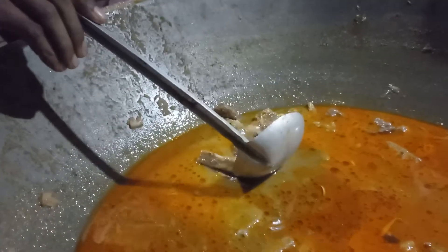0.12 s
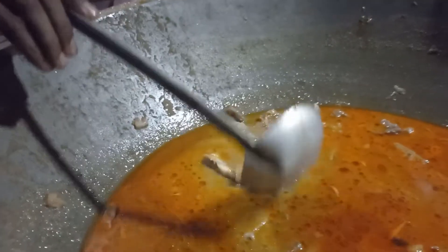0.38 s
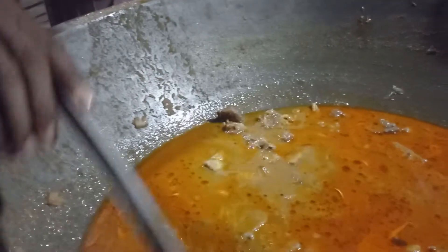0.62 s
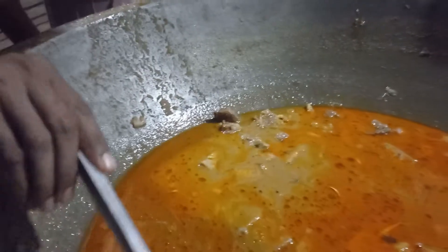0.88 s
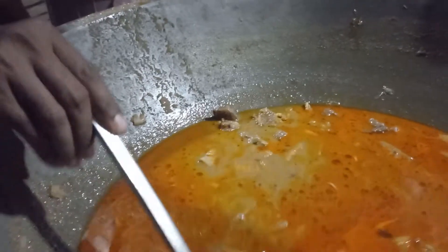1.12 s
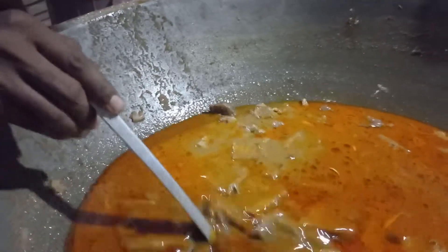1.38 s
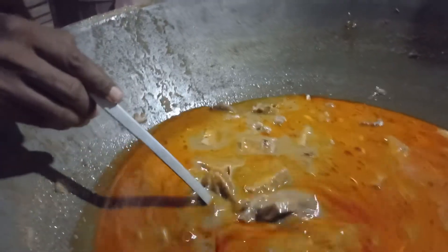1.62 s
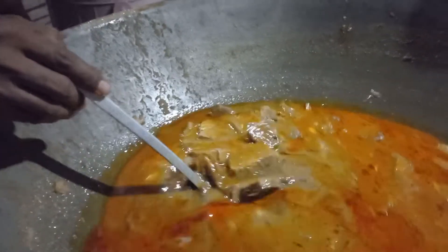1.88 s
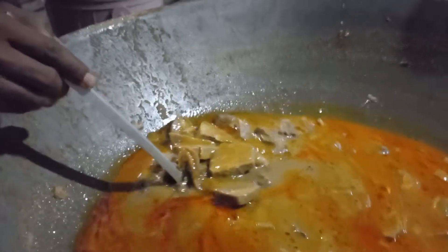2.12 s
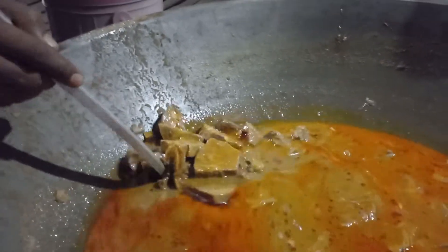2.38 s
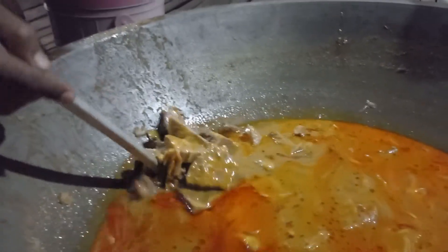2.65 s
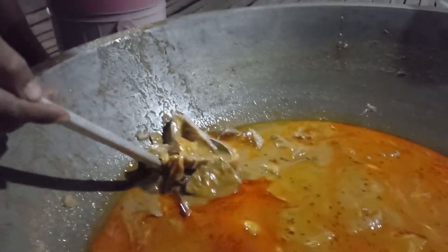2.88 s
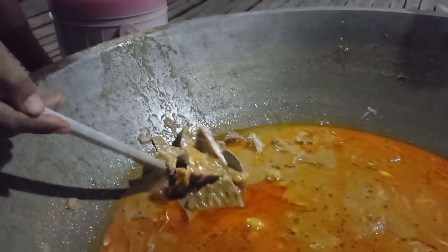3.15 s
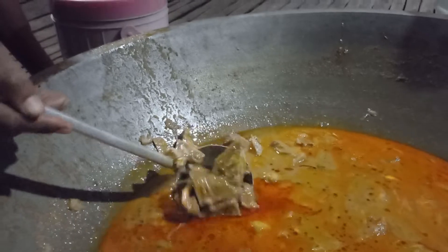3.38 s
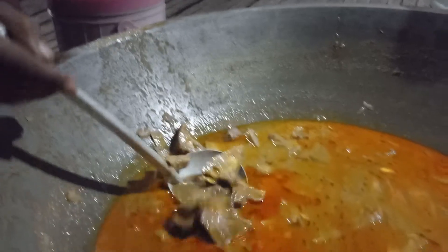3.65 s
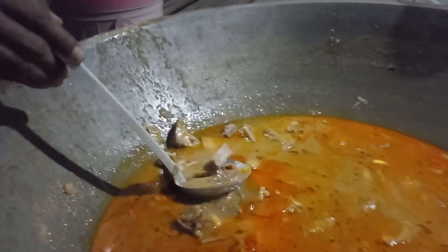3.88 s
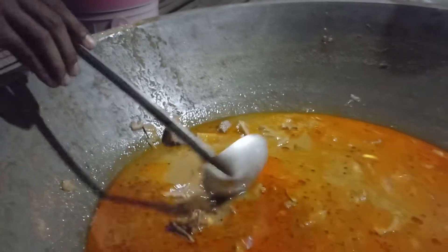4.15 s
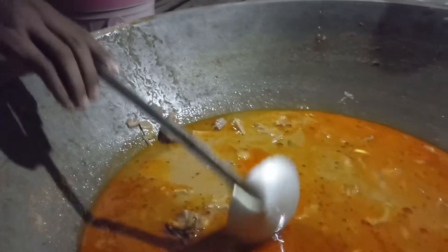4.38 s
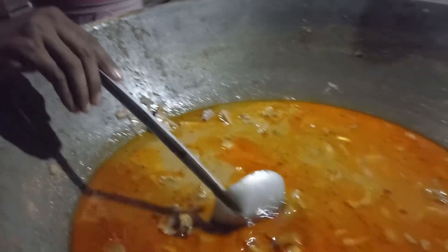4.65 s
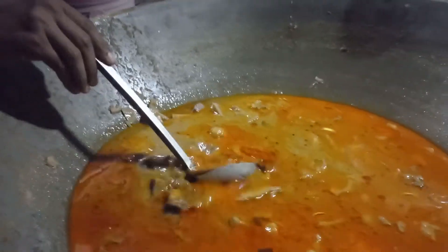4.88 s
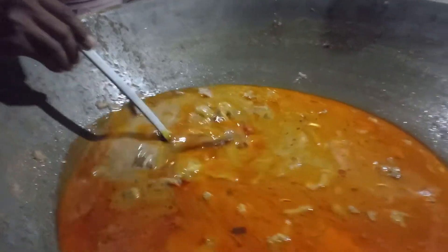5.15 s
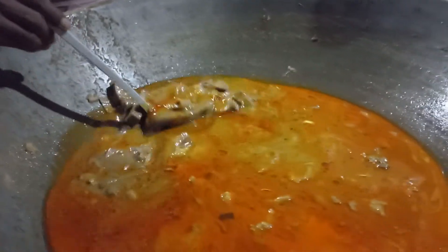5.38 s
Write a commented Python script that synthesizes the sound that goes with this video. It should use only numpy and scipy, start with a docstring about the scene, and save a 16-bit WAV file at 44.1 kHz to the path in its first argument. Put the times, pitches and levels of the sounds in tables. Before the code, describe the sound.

A metal ladle scrapes hard along the wall of a big full wok, with light taps and drips, over a distant engine outdoors.

```python
"""Outdoors, by a large wok of broth: air rumble, faint treble noise and a distant engine run from the start.
Small ticks come first, then a metal ladle is dragged hard along the wall at 0.9 s, its grit ringing the bowl.
Light rubs, taps, a small knock and drips follow as the engine climbs; a high hiss steps up at 3.9 s and stays.
The second hard stroke comes at 5.0 s. Noise drives the air, cosines the engine, grit clicks the wok's modes."""
import sys
import numpy as np
from scipy import signal
from scipy.fft import rfft, irfft
from scipy.io import wavfile
from scipy.ndimage import uniform_filter1d

SR = 44100
rng = np.random.default_rng(int(sys.argv[2]) if len(sys.argv) > 2 else 0)


def attenuation_scalar(level_db):
    """Turn a level in dB into a linear amplitude multiplier (20 dB per decade)."""
    decades = np.asarray(level_db, float) / 20
    return 10 ** decades


def digitize_waveform(pressure):
    """Quantize a signal to 16-bit integers and store it at the path in sys.argv[1].

    Rows of a 2-D input are taken as channels; values are limited to [-1, 1].
    """
    field = np.atleast_2d(pressure).T
    bounded = np.clip(field, -1, 1)
    quanta = np.round(bounded * 32767).astype(np.int16)
    wavfile.write(sys.argv[1], SR, quanta)


N = 243431  # samples


def evened(x):
    """Scales to rms 1."""
    return x / np.sqrt(np.mean(x ** 2) + 1e-20)


def read(points, hz):
    """Reads a spectrum on a log-frequency axis."""
    f, value = np.transpose(points)
    return np.interp(np.log(hz + 1), np.log(f + 1), value)


def add(mix, s, sound):
    """Adds a sound of several rows at time s."""
    part = mix[:, round(s * SR):][:, :sound.shape[1]]
    part += sound[:, :part.shape[1]]


def band(x, lo_hz, hi_hz):
    """Band-pass."""
    return signal.sosfilt(signal.butter(3, [lo_hz, hi_hz], "band", fs=SR, output="sos"), x)


def drift(count, seconds):
    """Slow random drift of rms 1: noise averaged twice over the given time."""
    size = max(round(seconds * SR), 1)
    smooth = uniform_filter1d(rng.standard_normal(count), size)
    return evened(uniform_filter1d(smooth, size))


# likeness of left and right at the microphone pair: pitch_hz, likeness (-1 to 1)
LIKENESS = [(60, 0.99), (180, 0.96), (550, 0.76), (1650, -0.39), (4970, 0.036), (15000, -0.14)]


def paired(left, other, hz):
    """Mixes two independent spectra into a left and right as alike as the microphone pair hears them."""
    same = np.clip(read(LIKENESS, hz), -1, 1)
    return np.array([left, same * left + np.sqrt(1 - same ** 2) * other])


def noise(shape, patchy_db):
    """Two-channel noise from a magnitude over (Hz, s), alike in the bass, with drifting patches."""
    frames, hz = N // 256 + 5, np.fft.rfftfreq(1024, 1 / SR)[:, None]
    a, b, c, d, patches = rng.standard_normal((frames, 513, 5)).T
    patches = uniform_filter1d(patches, 8, axis=0)  # over pitch
    patches = evened(uniform_filter1d(patches, 10, axis=1))  # over time
    z = paired(a + 1j * b, c + 1j * d, hz)
    z *= shape(hz, np.arange(frames) * 256 / SR) * attenuation_scalar(patchy_db * patches)
    return signal.istft(z, nperseg=1024, noverlap=768)[1][:, :N]


# distant engine, also followed by the low mids of the air: start_s, firing_rate_hz, level_db (rms)
ENGINE_RUN = [(0, 53.74, -61), (1.498, 56.76, -57.5), (2.299, 58.77, -52), (2.971, 60.52, -46),
              (3.801, 61.34, -53.5), (4.401, 62.88, -51), (4.8, 62.64, -61.5)]
# colour of the outdoor air: pitch_hz, level_db (relative, per Hz)
AIR_COLOUR = [(40, -10), (60, 0), (107, -3.5), (139, -14), (183, -4), (205, -20), (417, -17), (730, -27.5),
              (2160, -28), (2700, -48.5), (4000, -82)]
# colour of the steady faint treble noise, with gaps between its bands: pitch_hz, level_db (relative)
TREBLE_COLOUR = [(1530, -43), (2600, -13.5), (3580, -12), (4460, -15.5), (5650, -4.5), (6190, -24),
                 (7200, -3), (8070, -17), (10100, -5.5), (14600, -1.5), (16000, -7.5)]
# colour of the high hiss: pitch_hz, level_db (relative)
HISS_COLOUR = [(10500, -28), (12500, -10.5), (13800, -1), (15900, 2)]
# rise of the high hiss: start_s, level_db (rms)
HISS_RISE = [(0, -61), (2.0, -50.5), (3.88, -45), (3.93, -36), (4.301, -35.5), (5.52, -35)]
AIR_DB, TREBLE_DB = -44.5, -51.5  # rms
RUMBLE_DB_PER_S, ROAR_SHARE = 0.5, 0.46  # growth of the rumble; dB of low mids per dB of engine
PASS_S, PASS_WIDTH_S, PASS_DB = 5.18, 0.51, 8  # the low mids swell once more, briefly


def outdoors():
    """Rumble that grows, low mids that follow the engine; steady treble noise and the high hiss on top."""
    engine_s, _, engine_db = np.transpose(ENGINE_RUN)

    def air_shape(hz, t):
        low = 1 / (1 + (hz / 180) ** 4)
        mid = 1 / (1 + (hz / 900) ** 3)
        roar_db = ROAR_SHARE * np.interp(t, engine_s, engine_db - engine_db[0])
        pass_db = PASS_DB * np.exp(-((t - PASS_S) / PASS_WIDTH_S) ** 2)
        swell_db = low * RUMBLE_DB_PER_S * t + (mid - low) * (roar_db + pass_db)
        return attenuation_scalar(read(AIR_COLOUR, hz) + swell_db)

    air = attenuation_scalar(AIR_DB) * evened(noise(air_shape, patchy_db=-0.5))
    treble = attenuation_scalar(TREBLE_DB) * evened(noise(lambda hz, t: attenuation_scalar(read(TREBLE_COLOUR, hz)), patchy_db=1.0))
    hiss = evened(noise(lambda hz, t: attenuation_scalar(read(HISS_COLOUR, hz)), patchy_db=0.6))
    hiss_db = np.interp(np.arange(N) / SR, *np.transpose(HISS_RISE))
    return air + treble + hiss * attenuation_scalar(hiss_db)


# harmonics heard from the engine: multiple of the firing rate, level_db (relative, before wavering)
HARMONICS = [(4, -3.5), (5, 4), (6, -6.5), (7, -2.5), (8, -5.5), (9, -7.5)]
# lone drones: start_s, end_s, pitch_hz, first_level_db, last_level_db (rms, before fades and wavering)
LONE_DRONES = [(0, 1.87, 139.5, -52.5, -56), (2.4, 3.4, 200.5, -50, -53), (0, 5.39, 72, -55, -50)]
DRONE_IN_S, DRONE_OUT_S = 0.097, 0.53  # fades


def engine():
    """Wavering harmonics of the firing rate, and lone drones; the same in both channels."""
    t, out = np.arange(N) / SR, np.zeros(N)
    s, rate_hz, level_db = np.transpose(ENGINE_RUN)
    turns = np.cumsum(np.interp(t, s, rate_hz) * (1 + 0.0033 * drift(N, 0.056))) / SR
    for multiple, harmonic_db in HARMONICS:
        swell = attenuation_scalar(harmonic_db + 1.6 * drift(N, 0.11))
        out += swell * np.cos(2 * np.pi * (multiple * turns + rng.random()))
    out = evened(out) * attenuation_scalar(np.interp(t, s, level_db))
    for start, end, hz, first_db, last_db in LONE_DRONES:
        fade = np.interp(t, [start, start + DRONE_IN_S, end - DRONE_OUT_S, end], [0, 1, 1, 0])
        turns = np.cumsum(hz * (1 + 0.012 * drift(N, 0.0765))) / SR
        db = np.interp(t, [start, end], [first_db, last_db]) + 2.0 * drift(N, 0.167)
        out += np.sqrt(2) * fade * attenuation_scalar(db) * np.cos(2 * np.pi * turns)
    return out


# small ticks, some of them the bright click of a ladle knock:
# start_s, level_db (rms at onset), centre_hz, spread_octaves (each way)
SMALL_TICKS = [(0.4357, -23.5, 8100, 0.82), (0.467, -25, 10200, 1.4), (0.504, -30.5, 8000, 1.9),
               (1.252, -32, 10000, 0.82), (2.188, -27.5, 4470, 0.43), (2.602, -35.5, 4200, 0.54),
               (2.6115, -28, 3980, 0.26), (2.7345, -19.5, 5700, 1.6), (3.7382, -30, 4960, 2.2),
               (4.0518, -28.5, 3500, 0.56)]
# drips and one small knock (at 3.7377 s), all short tones:
# start_s, level_db (left, undecayed), pitch_hz (at onset), t60_s
SHORT_TONES = [(3.6516, -38, 3110, 0.026), (3.7377, -35.5, 1470, 0.017), (4.6681, -35, 1790, 0.042)]
# the full wok is bumped: start_s, boom_level_db (undecayed peak), thud_level_db (right, rms at onset)
WOK_BUMPS = [(1.216, -64, -30), (1.40, -39, -37), (4.979, -15.5, -32), (5.029, -28, -59), (5.098, -25, -41)]
BOOM_HZ, BOOM_T60_S = 221.2, 0.13
THUD_LO_HZ, THUD_HI_HZ, THUD_T60_S = 307, 947, 0.19


def broth():
    """Ticks are noise bursts, drips and a small knock short rising tones, bumps one deep mode and a thud."""
    out, t = np.zeros((2, N)), np.arange(2000) / SR
    for s, db, hz, octaves in SMALL_TICKS:
        spread = 2 ** max(octaves, 0.1)
        burst = evened(band(rng.standard_normal((2, len(t))), hz / spread, min(hz * spread, SR / 2.5)))
        snap = attenuation_scalar(-60 * t / 0.0031)
        spray = min(octaves, 1) ** 2 * attenuation_scalar(-15.0 - 60 * t / 0.081)  # wide ticks trail more of it
        add(out, s, burst * (snap + spray) * attenuation_scalar(db))
    for s, db, hz, t60 in SHORT_TONES:
        rising = np.sin(2 * np.pi * hz * t * (1 + 2.1 * t))
        tone = rising * np.minimum(t / 0.00068, 1) * attenuation_scalar(db - 60 * t / t60)
        add(out, s, np.array([tone, 0.32 * tone]))
    t = np.arange(SR // 4) / SR
    for s, boom_db, thud_db in WOK_BUMPS:
        boom = np.sin(2 * np.pi * BOOM_HZ * t) * np.minimum(t / 0.0097, 1)
        boom *= attenuation_scalar(boom_db - 60 * t / BOOM_T60_S)
        thud = evened(band(rng.standard_normal(len(t)), THUD_LO_HZ, THUD_HI_HZ))
        thud *= attenuation_scalar(thud_db - 60 * t / THUD_T60_S)
        add(out, s, np.array([boom + 0.485 * thud, boom + thud]))
    return out


# named modes of the wok wall: pitch_hz, level_db (relative, before the spot scatter)
WALL_MODES = [(772, -10), (993, -10), (1233, -8), (1489, -6), (1594, -8), (1762, 3), (1899, 7), (2001, 7),
              (2110, 6), (2190, 4), (2289, 5), (2388, 5), (2580, 1)]
# dense modes in between: pitch_hz, level_db (relative, per Hz)
DENSE_MODES = [(350, -24), (700, -17), (1000, -7), (1500, -3), (1900, 4), (2500, 3), (2750, -8.5),
               (5800, -7.5), (6500, -13), (9500, -7.5), (12500, -16.5), (16000, -18)]
MODE_T60_S, DENSE_T60_S, DENSE_DB = 0.09, 0.07, 3  # dense level is relative to the named modes
SPOT_DB = 2  # scatter of the modes from spot to spot
DEEP_HZ, EDGE_FROM_HZ = 1600, 2700  # borders of the deep, middle and edge parts
DEEP_LEAN_DB = 3  # deep modes, left over right


def wok_rings():
    """The wall's damped answer to one click at one spot, split in deep, middle and edge parts."""
    t, (hz, db) = np.arange(8192) / SR, np.transpose(WALL_MODES)[:, :, None]
    spot_db, apart, start = rng.standard_normal((3, len(WALL_MODES), 1))
    size = attenuation_scalar(db + SPOT_DB * spot_db - 60 * t / MODE_T60_S)
    modes = []
    for side in (-1, 1):
        shift = side * apart * (hz / 1300) ** 2  # higher modes reach the two channels out of step
        modes.append((size * np.sin(2 * np.pi * (hz * t + start) + shift)).sum(0))
    f = np.fft.rfftfreq(len(t), 1 / SR)
    left, other = rfft(rng.standard_normal((2, len(t))))
    dense = irfft(paired(left, other, f) * attenuation_scalar(read(DENSE_MODES, f)))
    dense *= attenuation_scalar(-60 * t / DENSE_T60_S)
    rings = evened(np.array(modes)) + attenuation_scalar(DENSE_DB) * evened(dense)
    deep = band(rings, 200, DEEP_HZ)
    middle = band(rings, DEEP_HZ, EDGE_FROM_HZ)
    edge = band(dense, EDGE_FROM_HZ, 21700) * attenuation_scalar(-60 * t / 1.4)
    deep, middle, edge = [p / np.linalg.norm(p, axis=1)[:, None] for p in (deep, middle, edge)]
    return deep * attenuation_scalar(DEEP_LEAN_DB / 2 * np.array([[1], [-1]])), middle, edge


# hard drags, one list a contact of the ladle edge with the wall: start_s, pressure_db (as rub level)
DRAGS = [
    [(.884, -37.5), (.94, -27), (.99, -17.5), (1.025, -19), (1.09, -21), (1.14, -20.5), (1.18, -18.5),
     (1.225, -17.5), (1.27, -26), (1.315, -35)],
    [(1.328, -14), (1.345, -26.5), (1.41, -47.5), (1.44, -51)],
    [(4.977, -40.5), (5.03, -24), (5.09, -23)],
    [(5.094, -31), (5.125, -16), (5.14, -20), (5.175, -23), (5.195, -25), (5.245, -43.5), (5.275, -52.5),
     (5.35, -60)],
]
# one row a contact: first_muffled_share, last_muffled_share (0-1, under broth)
MUFFLING = [(0, 0.44), (0.31, 0.4), (0.58, 0.44), (0.51, 0)]
# faint drag through the broth: start_s, level_db (before wavering)
FAINT_DRAG = [(1.44, -56), (1.75, -61), (2.0, -55), (2.6, -57.5), (2.85, -60), (4.62, -72), (4.749, -50.5),
              (4.95, -77)]
# ladle knocks and scuffs on the wall: start_s, level_db (drive), edge_db (relative), skid_s (decay to 1/e)
TAPS = [(1.4468, -38, -2.5, 0.011), (1.555, -45, 4, 0.016), (1.5776, -43, -9, 0.023),
        (1.645, -49.5, 4.5, 0.024), (1.6643, -36.5, -4.5, 0.01), (2.0245, -44, -16, 0.0062),
        (2.128, -42.5, -6, 0.025), (2.3236, -46, -5, 0.036), (2.6, -29.5, -15, 0.0059),
        (2.612, -31.5, -33, 0.0075), (2.7329, -36.5, -1, 0.016), (4.9775, -27, -5, 0.0036),
        (5.0943, -13, -2.5, 0.011), (5.232, -30.5, 2.5, 0.0045)]
# the edge crosses a spot where one mode sings out: centre_s, pitch_hz, level_db (relative to the rub)
SINGING_SPOTS = [(1.011, 1002, -9.5), (1.025, 2230, -7.5), (1.08, 1903, -6.5), (1.179, 2060, -1.5),
                 (1.28, 1710, -7.5), (1.45, 2289, 0), (2.336, 765, 2.5), (2.74, 2394, -2.5),
                 (5.03, 2350, -9), (5.13, 1804, -6)]
SING_S, SING_T60_S, REACH_S = 0.018, 0.05, 0.1  # time to cross; ring; span worked on each side
# harder pressure wakes mostly the middle modes; deep modes and edge hiss gain only a share of each dB
FIRM_DB = -25  # pressure at which the two offsets hold
DEEP_DB, DEEP_SHARE, EDGE_DB, EDGE_SHARE = -4, 0.69, -5, 0.79
# deep modes at a 10 ms skid; longer skids lean in and reach deeper
SKID_DEEP_DB, SKID_DEEP_DB_PER_DOUBLING = -20, 9.5
SUNK_HZ, TOUCH_S = 8840, 0.0029  # treble edge under broth; rise of a contact
SLIP_DB, SLIP_S = 2.2, 0.0025  # stick and slip of the edge
WANDER_DB, WANDER_S = 1.3, 0.03  # the three parts swell apart as the edge rocks
BARE_DB = -7  # bare clicks of the edge, heard directly


def ladle(spots=6):
    """Dense uneven clicks under the stroke and short scuffs; the contact moves round a few spots."""
    t, drive, out = np.arange(N) / SR, np.zeros((3, N)), np.zeros((2, N))  # drive: deep, middle, edge
    sizes = attenuation_scalar(3.18 * np.minimum(rng.exponential(1, N), 4))
    clicks = (rng.random(N) < 6000 / SR) * rng.choice([-1, 1], N)  # about 6000 a second
    grit = sizes * clicks
    grit = evened(grit * attenuation_scalar(SLIP_DB * drift(N, SLIP_S)))
    muffled = band(grit, 130, SUNK_HZ)
    rocking = attenuation_scalar(WANDER_DB * np.array([drift(N, WANDER_S) for _ in drive]))
    for (s, db), (first, last) in zip(map(np.transpose, DRAGS), MUFFLING):
        sunk = np.clip(np.interp(t, s[[0, -1]], [first, last]), 0, 1)
        over_db = np.interp(t, s, db) - FIRM_DB
        parts_db = np.array([DEEP_DB + DEEP_SHARE * over_db, over_db, EDGE_DB + EDGE_SHARE * over_db])
        on = np.clip((t - s[0]) / TOUCH_S, 0, 1) * (t < s[-1])
        rub = (sunk * muffled + (1 - sunk) * grit) * on
        drive += rub * rocking * attenuation_scalar(FIRM_DB + parts_db)

    s, db = np.transpose(FAINT_DRAG)
    faint_db = np.interp(t, s, db) + 2.0 * drift(N, 0.02)
    drive += grit * (t > s[0]) * attenuation_scalar(faint_db + np.array([[-6], [0], [-4]]))

    skid = np.arange(SR // 8) / SR
    for s, db, edge_db, skid_s in TAPS:
        skid_s = max(skid_s, 1e-3)
        push = rng.standard_normal(len(skid)) * np.exp(-skid / skid_s)
        push[0] += 9  # first touch
        deep_db = SKID_DEEP_DB + SKID_DEEP_DB_PER_DOUBLING * np.log2(skid_s / 0.01)
        add(drive, s, band(push, 100, SUNK_HZ) * attenuation_scalar(db + np.array([[deep_db], [0], [edge_db]])))

    for (s, hz, db), turn in zip(SINGING_SPOTS, rng.random((len(SINGING_SPOTS), 2, 1))):
        ring = np.sin(2 * np.pi * (hz * skid + turn / 2)) * attenuation_scalar(-60 * skid / SING_T60_S)
        near = slice(round((s - REACH_S) * SR), round((s + REACH_S) * SR))
        push = drive[1:2, near] * attenuation_scalar(db) * np.exp(-((t[near] - s) / SING_S) ** 2)
        add(out, s - REACH_S, signal.oaconvolve(push, ring / np.linalg.norm(ring[0])))

    out += band(drive[2], DEEP_HZ, 16000) * attenuation_scalar(BARE_DB) * np.array([[1], [0.5]])
    for k in range(spots):
        # each spot is reached every 0.2 s; the root keeps the summed power level
        here = np.cos(np.pi * (t / 0.2 + k / spots)) ** 4 * np.sqrt(128 / 35 / spots)
        for push, ring in zip(drive, wok_rings()):
            out += signal.oaconvolve((push * here)[None], ring)[:, :N]
    return out


def scene():
    """Ladle and broth in front, engine and air behind."""
    return ladle() + broth() + engine() + outdoors()


# tilt of the microphone pair: pitch_hz, level_db (left over right)
PAIR_TILT = [(60, -0.5), (240, -1.5), (950, -3.5), (2000, -2), (8000, 1), (15000, -3.5)]


def low_pass(x):
    """Removes everything above the highest recorded frequency."""
    return signal.sosfilt(signal.butter(12, 16990, fs=SR, output="sos"), x)


def record(dry):
    """The microphone pair: its two sides differ in colour; the bass is cut and the top band-limited."""
    hz = np.fft.rfftfreq(N, 1 / SR)
    tilt = attenuation_scalar(read(PAIR_TILT, hz) / 2 * np.array([[1], [-1]]))
    top_limit = 1 / np.sqrt(1 + (hz / 15900) ** 400)
    bass_cut = 1 / np.sqrt(1 + (52 / (hz + 1)) ** 8)
    finished = irfft(rfft(dry) * tilt * top_limit * bass_cut, N)
    return low_pass(finished)


dry = scene()
out = record(dry)
digitize_waveform(out)
```